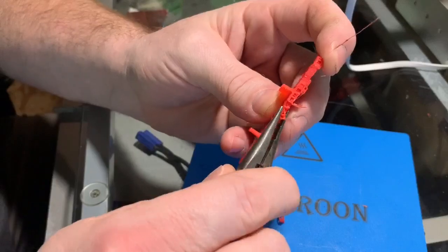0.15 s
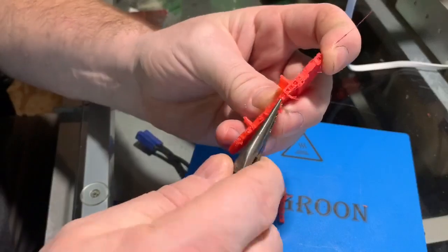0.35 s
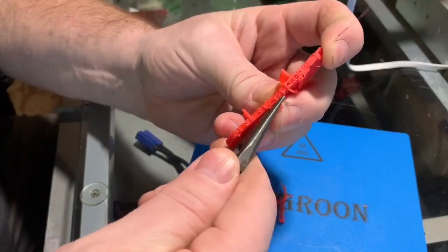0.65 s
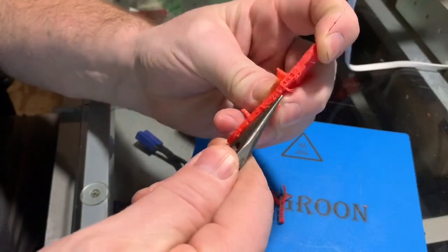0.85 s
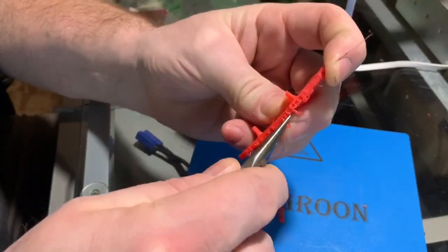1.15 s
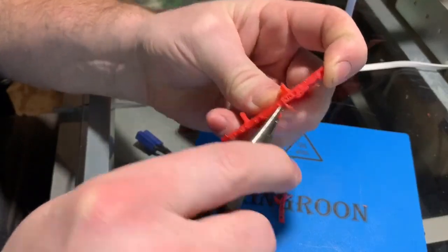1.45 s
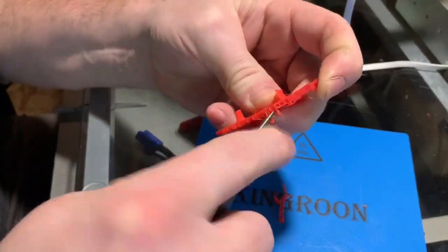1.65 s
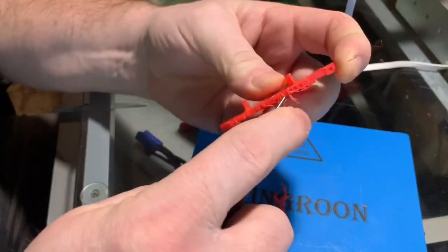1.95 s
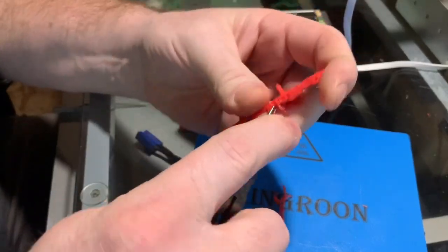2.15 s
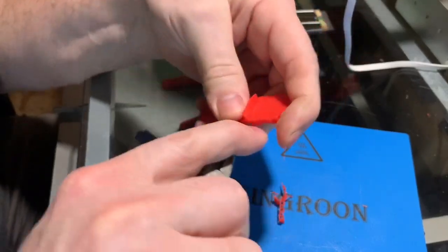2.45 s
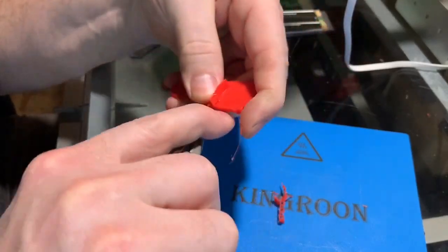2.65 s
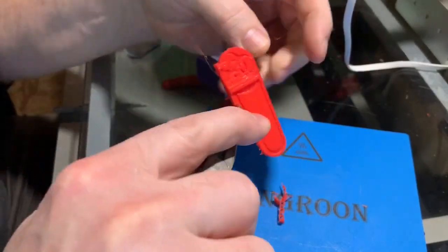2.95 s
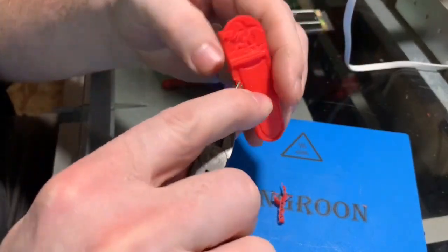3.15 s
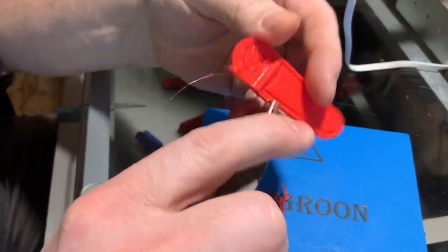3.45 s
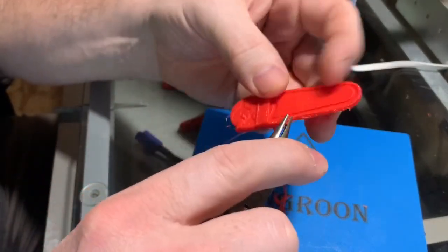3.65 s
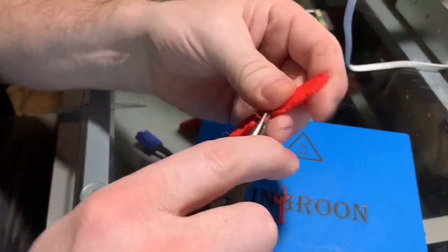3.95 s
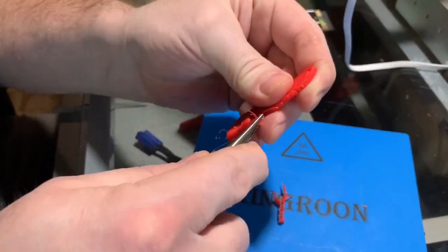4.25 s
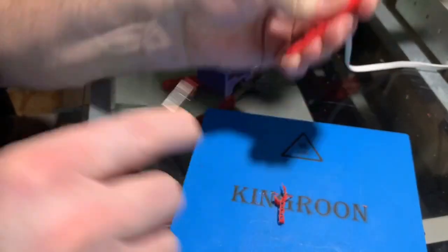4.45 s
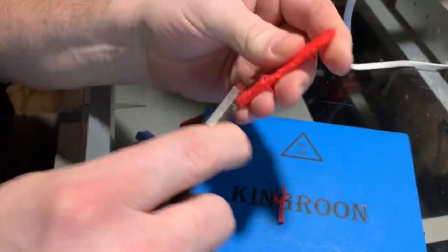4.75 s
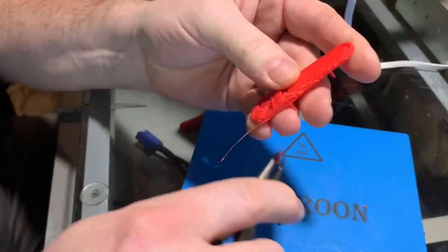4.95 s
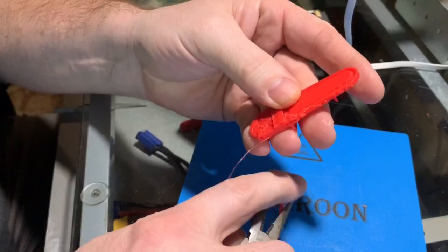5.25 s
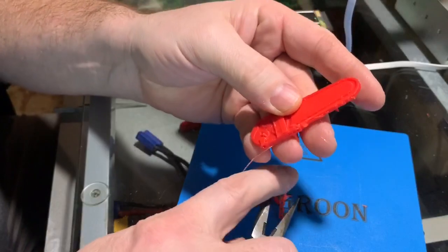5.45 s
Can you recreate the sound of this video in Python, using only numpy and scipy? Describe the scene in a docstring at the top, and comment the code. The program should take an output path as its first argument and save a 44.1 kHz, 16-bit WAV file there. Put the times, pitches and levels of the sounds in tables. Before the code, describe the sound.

Isolated dry plastic clicks, then a crumbling crackle and hard snaps with soft thumps, while machine fans hum and hiss quietly behind.

```python
"""Brittle struts tick, snap and crumble close by, steel jaws ring faintly, and fans hum and hiss behind.
Needle-nose pliers crack the supports off a small plastic part in a small room; fingers rub the part.
Cracks are short breaks and splinters of noise that ring the part's resonances; pings and thumps are dying sines.
The fans are coloured noise with steady tones. Two microphones hear it all, with echoes of the near sounds."""
import sys
import numpy as np
from scipy import signal
from scipy.fft import rfft, irfft, next_fast_len
from scipy.io import wavfile

SR = 44100
rng = np.random.default_rng(int(sys.argv[2]) if len(sys.argv) > 2 else 0)


def int16_out(signal):
    """Quantize to a 16-bit WAV file."""
    q = np.round(np.clip(np.atleast_2d(signal).T, -1, 1) * 32767)
    wavfile.write(sys.argv[1], SR, q.astype(np.int16))


N = 247577
SIZE = next_fast_len(N)     # length for fast spectra
HZ = np.maximum(np.arange(SIZE // 2 + 1) * SR / SIZE, 1)     # frequency of each spectrum bin
RIGHT_LEADS_MS = 0.203     # sound reaches the right microphone this much earlier


def from_db(db):
    """Turn decibels into gain."""
    return 10 ** (np.asarray(db) / 20)


def rms_one(x):
    """Scale to an rms of 1."""
    return x / np.sqrt(np.mean(x ** 2) + 1e-20)


def in_time(rows):
    """Draw curves through rows that start with a time, one value a sample."""
    s, *columns = np.transpose(rows)
    return [np.interp(np.arange(N) / SR, s, column) for column in columns]


def in_hz(rows):
    """Draw curves through rows that start with a frequency, one value a spectrum bin."""
    hz, *columns = np.transpose(rows)
    return [np.interp(np.log(HZ), np.log(hz), column) for column in columns]


def drift(rate_hz):
    """Slow random wandering with a spread of 1, made at every 40th sample and joined by lines."""
    r = np.exp(-80 * np.pi * rate_hz / SR)
    noise = rng.standard_normal(N // 40 + 2002)
    slow = signal.lfilter([1], [1, -2 * r, r * r], noise)[2000:]     # leave out the filter's start
    return np.interp(np.arange(N) / 40, np.arange(len(slow)), rms_one(slow))


def resonate(x, hz, width_hz):
    """Two-pole resonance that passes its own pitch with gain 1."""
    r = np.exp(-np.pi * width_hz / SR)
    top = np.array([1, 0, -1]) * (1 - r * r) / 2
    return signal.lfilter(top, [1, -2 * r * np.cos(2 * np.pi * hz / SR), r * r], x + 1e-18)


def ring(clicks, hz, t60_s):
    """Each click of height 1 starts a sine of height 1 that falls 60 dB in t60_s."""
    r, w = from_db(-60 / (t60_s * SR)), 2 * np.pi * hz / SR
    return signal.lfilter([0, np.sin(w)], [1, -2 * r * np.cos(w), r * r], clicks + 1e-18)


def plastic():
    """A crack is a sharp break and dying splinters, crumbling a dense rain of fractures; both ring the part."""
    # struts cracking: t/s, level/dB, then relative levels: body under 4 kHz/dB, shoulder 5-6 kHz/dB,
    # face 7-8 kHz/dB, edge over 13 kHz/dB; last, crack length/ms
    snaps = [(0.2264, -29.5, -12, -12, -15, -6, 0.67), (0.4142, -31.5, -24, -16, -12, -14, 0.37),
             (.449, -50, -4, -12, -12, -6, 1.9), (1.0118, -44, -10, 0, -2, 5, 0.77),
             (1.4796, -14, -15, -7, -1, 0, 0.43), (1.4825, -34, -6, 7, -4, -2, 1.5),
             (1.651, -49.5, -14, -10, 2, 7, 4.3), (2.283, -47, -14, -14, -14, 10, .7),
             (2.3133, -52, -8, -15, -15, 14, 0.75), (2.354, -39.5, -22, -9, -2, 8, 0.79),
             (2.675, -47, 4, -8, -16, -11, 1.5), (2.6785, -51, 12, -4, -10, -6, 1.8),
             (2.6845, -48, 9, -8, -8, -6, 2.5), (2.689, -48, 7, -4, -2, -4, 2.4),
             (2.6945, -50, 9, 2, -8, -8, 1.5), (2.7008, -33, 2, -3, -9, -9, 3.0),
             (2.7039, -38, 3, 2, -4, -8, 1.7), (2.709, -44, 2, 0, -6, -6, 1.5),
             (2.712, -45, 2, -6, -12, -8, 1.5), (2.719, -29.5, 5, -3, -16, -9, 2),
             (2.7216, -21.5, -6, -6, -1, -6, 1.2), (2.724, -37, -1, -1, 8, -6, 2.2),
             (2.7291, -37, 8, 3, 0, -2, 1.2), (2.7323, -22, -0.5, 4.5, -1.5, 5.5, 0.85),
             (2.737, -32.5, 0, -6, -3, -6, 1), (2.7402, -37, 2, 1, -8, 5, 1.6),
             (2.745, -39, 2, 2, 7, -8, 2.2), (2.7496, -46, 7, 4, 2, -4, 1.5),
             (2.7565, -49, 1, 9, 0, 3, 1.5), (2.763, -52, 6, 2, -2, 0, 1.5),
             (2.7775, -46, -6, 4, -6, -8, 1.2), (2.7875, -52, -4, 4, -2, -6, 1),
             (3.6335, -49, -14, -14, -14, 12, .7), (3.677, -46, -10, -4, -1, 5, 0.78),
             (3.776, -39.5, -7, 1, -6.5, 9, 1), (4.3639, -26, -13, 5, 2, -4, 0.67),
             (4.3668, -24, -1.5, 3, -10, -7, 0.81), (4.3683, -39, -12, 9, -10, -12, 1.7),
             (4.380, -52, -2, 12, -8, -8, 1.5), (4.3857, -20, -5, 8.5, 4, 5, 0.68),
             (4.3932, -49, 2, 11, -2, -8, 1.6), (4.397, -53, 0, 9, -3, -8, 1.5),
             (4.8555, -62, -10, -10, -10, 10, .8), (4.8675, -58, -10, -10, -10, 10, .8),
             (4.9445, -60, -14, -14, -14, 13, 1), (5.029, -35.5, -11, -12, -23, -3, 1.6),
             (5.128, -51, -12, -13, -15, 0, 1.3)]
    # broad resonances of the plastic part: f/Hz, width/Hz, relative level/dB
    part = [(800, 700, -14), (1700, 600, -7), (2600, 800, -2), (3700, 1200, -4), (4800, 900, -5),
            (5900, 1100, -5), (7500, 850, 6.5), (8400, 1100, 4), (9800, 1200, -1), (11400, 1400, 0),
            (12600, 1400, 0), (13900, 1400, 0), (15300, 1600, 2)]
    break_share, fracture_share = 0.57, 0.38     # the first clean break and the splintering after it
    drive_lift_db = 16     # a common lift of each crack's whole drive, break and splinters alike, over its level column

    t = np.arange(800) / SR
    fractures = fracture_share * rng.standard_normal((len(snaps), 2, len(t)))
    length_s = np.array(snaps)[:, 6:] / 1000
    fractures *= (1 - np.exp(-2 * t / length_s))[:, None]     # small fractures swell in after the break
    # cracks longer than 0.8 ms start with a weaker clean break
    fractures[:, :, 0] = break_share * np.minimum(.0008 / length_s, 1) ** 2
    # the second of the two sounds breaks with its own signs
    signs = rng.choice([-1, 1], (len(snaps), len(part)))

    sizes = from_db(2.5 * np.minimum(rng.exponential(1, N), 4))
    per_second = 4000 * from_db(5 * drift(60))
    sizes = sizes * (rng.random(N) < per_second / SR)
    rain = rms_one(sizes) * rng.choice([-1, 1], (2, N))

    out = np.zeros((2, N))
    for k, (hz, width_hz, part_db) in enumerate(part):
        drive = rain * rain_gain(hz) * from_db(3.8 * drift(83))
        for snap, noise, sign in zip(snaps, fractures, signs):
            s, snap_db, body_db, shoulder_db, face_db, edge_db, length_ms = snap
            colour_db = np.interp(hz, [3700, 4800, 5900, 7600, 9500, 12500, 13500],
                                  [body_db, shoulder_db, shoulder_db, face_db, 0, 0, edge_db])
            at = round(s * SR)
            decay = np.exp(-1000 * t / max(length_ms, .1))
            gain = from_db(snap_db + colour_db + drive_lift_db)
            drive[:, at:at + len(t)] += gain * decay * noise * [[1], [sign[k]]]
        # two passes give steep flanks; each is wider, so that together they have about the listed width
        rung = resonate(resonate(drive, hz, 1.55 * width_hz), hz, 1.55 * width_hz)
        out += (-1) ** k * from_db(part_db + 1) * rung     # neighbours take opposite signs
    return out


def rain_gain(hz):
    """Each rain of fractures swells, holds and dies away, with its own level for low and high resonances."""
    # a row of struts tears off or fingers rub the layer lines:
    # t/s, hold/s, level/dB, relative body under 6 kHz/dB, relative edge over 11 kHz/dB
    rains = [(0.443, .01, -65, -10, 0), (1.49, 0.045, -66, 0, 2), (1.658, 0.0079, -67, -16, -9),
             (2.278, .03, -71, -5, 0), (2.673, .012, -61, 3, 7), (2.692, .006, -62, -1, 0),
             (2.724, 0.022, -53, 6, 7), (2.774, 0.03, -66, 7, 0), (3.69, .07, -78, 2, -2),
             (3.81, .06, -76, 4, 11), (3.88, 0.031, -68.5, 13.5, 4), (4.392, .04, -72, 6, -12),
             (4.75, 0.31, -78, -5, 7)]
    rise_db_per_s, fall_db_per_s = 500, 600
    s, hold_s, level_db, body_db, edge_db = np.transpose(rains)[:, :, None]
    t = np.arange(N) / SR - s
    slope_db = np.minimum(rise_db_per_s * t, 0) - fall_db_per_s * np.maximum(t - hold_s, 0)
    body_share = np.interp(hz, [5900, 7500], [1, 0])
    edge_share = np.interp(hz, [8400, 11000], [0, 1])
    colour_db = body_db * body_share + edge_db * edge_share
    return from_db(level_db + slope_db + colour_db).sum(axis=0)


def pliers():
    """Each slip of the hinge is a short burst of friction noise that sets the steel jaws ringing."""
    # slips of the hinge: t/s, strength/dB
    touches = [(5.128, -69), (5.138, -63), (5.157, -53), (5.17, -66), (5.200, -56), (5.226, -56),
               (5.236, -74)]
    # ringing of the steel jaws: f/Hz, relative level/dB, time to fall 60 dB/s
    jaws = [(3770, -5, 0.04), (6700, 1.5, 0.033), (11400, -7, 0.019), (13500, -8, .015)]
    s, slip_db = np.transpose(touches)
    slips = np.zeros(N)
    slips[(s * SR).astype(int)] = from_db(slip_db)
    burst = ring(slips, 30, 0.031)     # a fast-dying slow swing shapes the noise
    friction = burst * rng.standard_normal((2, N)) * 0.4
    return sum(from_db(jaw_db) * ring(friction, hz, t60_s) for hz, jaw_db, t60_s in jaws)


def jolts():
    """One push, one dying ring: low in the bench, a knock in the part, high in the jaw tips."""
    # a freed piece jerks the hands against the bench, a boom of its own pitch:
    # t/s, level/dB, f/Hz, relative answer of the bench/dB
    thumps = [(2.736, -40, 93, 0), (2.779, -48, 45, -13), (2.81, -46, 42, -10), (4.389, -33.5, 56.7, -8)]
    # the bench top answers each thump: f/Hz, relative level/dB, time to fall 60 dB/s
    bench_modes = [(165, 2.5, 0.086)]
    # short pitched knocks within the cracks, some with several pitches at once: t/s, level/dB, f/Hz
    knocks = [(1.4805, -28.5, 2610), (1.4803, -38.5, 3600), (1.4803, -44, 4300), (2.678, -39, 2400),
              (2.685, -32.5, 1750), (2.6865, -32.5, 2300), (2.6895, -38, 2550), (2.7035, -35, 3000),
              (2.7043, -36, 6300), (2.7206, -32, 2880), (2.7233, -25, 1700), (2.7328, -30, 3900),
              (2.7329, -30, 6500), (2.74, -32, 6000), (2.778, -44, 6200), (2.7245, -24, 780),
              (2.741, -30.5, 536), (2.737, -42, 1400), (2.747, -30, 1530), (4.3865, -29.5, 2270),
              (4.3868, -36.5, 1300)]
    # pings of the jaw tips: t/s, level/dB, f/Hz
    pings = [(4.364, -42, 4690), (4.387, -43, 4780),  (5.013, -50, 9970), (5.029, -52, 4690)]
    # the jaws' teeth tick over the layer lines: t/s, level/dB, f/Hz
    ticks = [(4.7395, -57, 11600), (4.7595, -59, 11700), (4.792, -56, 12200), (4.8015, -50, 12000),
             (4.815, -58, 11700), (4.8275, -52, 11800), (4.8345, -53, 11500), (4.904, -60, 12200),
             (5.352, -52, 11600), (5.358, -57, 11800), (5.384, -63, 11600)]
    thump_t60_s, knock_t60_s, ping_t60_s, tick_t60_s = 0.17, 0.0079, 0.06, 0.014
    other_jaw_ratio, other_jaw_db = 1.045, -9     # the second jaw differs in pitch, so the pair beats

    rings = []     # t/s, level/dB, f/Hz, time to fall 60 dB/s
    for s, level_db, hz, answer_db in thumps:
        rings.append((s, level_db, hz, thump_t60_s))
        for mode_hz, mode_db, t60_s in bench_modes:
            rings.append((s, level_db + answer_db + mode_db, mode_hz, t60_s))
    rings += [(*row, knock_t60_s) for row in knocks]
    rings += [(*row, tick_t60_s) for row in ticks]
    for s, level_db, hz in pings:
        rings.append((s, level_db, hz, ping_t60_s))
        rings.append((s, level_db + other_jaw_db, hz * other_jaw_ratio, ping_t60_s))

    out = np.zeros(N)
    for s, level_db, hz, t60_s in rings:
        push = np.zeros(N)
        push[round(s * SR)] = from_db(level_db)
        out += ring(push, hz, t60_s)
    return signal.sosfilt(signal.butter(2, 40, "high", fs=SR, output="sos"), out)


def room(x):
    """Quick reflections off hands and bench, then a longer, duller cloud from the walls."""
    # colour of what hands, bench and walls send back: f/Hz, level/dB
    echo_colour = [(3500, 1.5), (5000, 0), (6200, 3), (7600, -10), (9500, 3.5), (12000, -3), (15000, -3)]
    bench_t60_s, bench_db = 0.045, -7.5
    walls_t60_s, walls_db = 0.27, -17
    t = np.arange(SR // 2) / SR
    bench, walls = rng.standard_normal((2, 2, len(t))) * (1 - np.exp(-t / .001))
    bench = bench * (rng.random(bench.shape) < 2500 / SR)     # separate reflections, not a wash
    walls = signal.sosfilt(signal.butter(1, .4 * SR, fs=SR, output="sos"), walls)
    cloud = 0
    for echoes, t60_s, level_db in [(bench, bench_t60_s, bench_db), (walls, walls_t60_s, walls_db)]:
        echoes = echoes * from_db(-60 * t / t60_s)
        cloud = cloud + from_db(level_db) * echoes / np.sqrt(np.sum(echoes ** 2) / 2)
    returned = signal.fftconvolve(x, cloud, axes=1)[:, :N]
    return irfft(rfft(returned, SIZE) * from_db(in_hz(echo_colour)[0]), SIZE)[:, :N]


def microphones(pair, near):
    """Left hears the first of two alike sounds; right hears it early and turned, mixed with the second."""
    # the two microphones: f/Hz, likeness of distant sound/0-1, likeness of near sound/0-1,
    # left minus right for distant sound/dB, phase turn/rad
    mics = [(60.4, 0.92, 0.7, -2, 0.3), (350, 0.98, 0.7, -0.5, -0.03), (794, 0.81, 0.2, 0.8, 0.82),
            (1820, 0.28, 0, -1, 0.03), (2360, 0.34, 0.57, -0.5, -1), (3700, 0.25, 0, 2, 1.25),
            (6160, 0, 0, -11.5, -0.1), (6320, 0.6, 0.83, 0, -1.6), (7040, 1, 1, 1.5, -1.48),
            (15500, 1, 1, 0, -1.5)]
    far_alike, near_alike, balance_db, turn = in_hz(mics)
    alike = np.clip(near_alike if near else far_alike, 0, 1)
    balance_db = balance_db * (.5 if near else 1)     # near sound takes half of the left-right difference
    first, second = rfft(pair, SIZE)
    mixed = alike * first + np.sqrt(1 - alike ** 2) * second
    right = mixed * np.exp(1j * (2 * np.pi * HZ * RIGHT_LEADS_MS / 1000 + turn))
    sides = [first * from_db(balance_db / 2), right * from_db(-balance_db / 2)]
    return irfft(sides, SIZE)[:, :N]


def fans():
    """Air rush with hollow resonances, swelling a little with turbulence, plus a hum, motor and mains tones."""
    # air rush: f/Hz, level in each Hz/dB
    rush = [(25, -112), (50, -79.5), (150, -76.5), (220, -82.5), (600, -81), (1100, -85), (2500, -90.5),
            (4200, -99), (5900, -102), (6250, -106), (6550, -101), (7000, -100), (7750, -112), (9000, -99),
            (10300, -107), (15700, -112)]
    # hollow resonances of housing and bench in the rush: f/Hz, width/Hz, top level in each Hz/dB, left-right/dB
    housing = [(70, 10, -77, -3), (99.7, 7.8, -76.5, 3), (280.7, 37.3, -68.5, -1.5), (369, 37, -75, 3),
               (423, 20, -76, -5.5), (691, 172, -78.5, 2), (818, 125, -80.5, 3), (950.7, 54.4, -72, -4.5),
               (1220, 92, -85, 1), (1466, 37, -81, 1), (1678, 104, -83, 2), (1800, 31, -87, -3),
               (1914, 120, -93, 5), (2173, 104, -82, 1.5), (2790, 270, -86, 1), (3083, 130, -87.5, -5.5),
               (3378, 80, -89.5, -0.5), (3880, 500, -102, -5), (4320, 80, -99, -1),
               (4790, 230, -94.5, -1.5), (4930, 67, -104, 25)]
    # steady hum near 280 Hz blurred by noise around it, one drawn course of its pitch and level:
    # t/s, f/Hz, rms level/dB
    hum_course = [(0, 285, -64), (.35, 285, -56), (.75, 285, -61.5), (.92, 284, -66), (1.1, 281, -58),
                  (1.5, 277, -53.5), (1.75, 281, -49.5), (1.9, 281, -55.5), (2.3, 280.5, -49.5),
                  (2.9, 280.6, -57), (3.2, 280.6, -49.5), (4.0, 281, -54), (4.12, 281, -54.5),
                  (4.35, 277, -50.5), (4.55, 278, -55), (4.8, 278, -50.5), (5.1, 280.5, -50.5),
                  (5.6, 275, -56.5)]
    # motor and mains tones: f/Hz, left rms level/dB, right rms level/dB
    tones = [(119.9, -64, -63), (240, -64, -63), (561, -64, -80), (858.5, -63, -74), (1717, -70, -72),
             (2150, -72, -80), (2246, -73, -77), (2575, -84, -76), (2836, -77, -78), (3052.5, -69, -72),
             (3433, -76, -79), (3780, -90, -79)]

    sides = np.array([[.5], [-.5]])     # left, right
    power = from_db(2 * in_hz(rush)[0]) * np.ones((2, 1))     # twice the dB turns gain into power
    for hz, width_hz, top_db, pan_db in housing:
        peak = 1 / (1 + (2 * (HZ - hz) / width_hz) ** 2) ** 2
        power += from_db(2 * (top_db + pan_db * sides)) * peak
    power[:, HZ > 15800] *= from_db(2 * -24.5)     # almost nothing of the hiss is kept above 15.8 kHz
    white = microphones(rng.standard_normal((2, N)), near=False)
    air = rfft(white, SIZE) * np.sqrt(power * SR / 2)

    out = 0
    together_db = .5 * drift(2.1)
    for share in np.eye(4):     # four overlapping ranges, each swelling partly on its own
        weight = np.interp(np.log(HZ), np.log([400, 1200, 3000, 7000]), share)
        band = irfft(air * weight, SIZE)[:, :N]
        out = out + band * from_db(together_db + 1.3 * drift(7.1))

    hum_hz, hum_db = in_time(hum_course)
    hum_turns = np.cumsum(hum_hz + 0.81 * drift(2.8)) / SR
    hum = np.sqrt(2) * from_db(hum_db) * np.sin(2 * np.pi * hum_turns)
    out += hum * from_db(-1.5 * sides)     # a little louder on the right

    for hz, left_db, right_db in tones:
        turns = np.cumsum(hz * (1 + .0005 * drift(1.5))) / SR + rng.random()
        lead_turns = hz * RIGHT_LEADS_MS / 1000 * np.array([[0], [1]])
        tone = np.sin(2 * np.pi * (turns + lead_turns))
        level_db = 0.5 * drift(9.8) + np.array([[left_db], [right_db]])
        out += np.sqrt(2) * from_db(level_db) * tone
    return out


def scene():
    """Hands and part close by with their echoes, fans behind."""
    hands = plastic() + pliers() + jolts()
    return fans() + microphones(hands + room(hands), near=True)


def record(dry):
    """A steep low-pass takes everything above 17 kHz down by at least 50 dB."""
    return signal.sosfilt(signal.cheby2(8, 50, 17000, fs=SR, output="sos"), dry)


dry = scene()
out = record(dry)
int16_out(out)
```